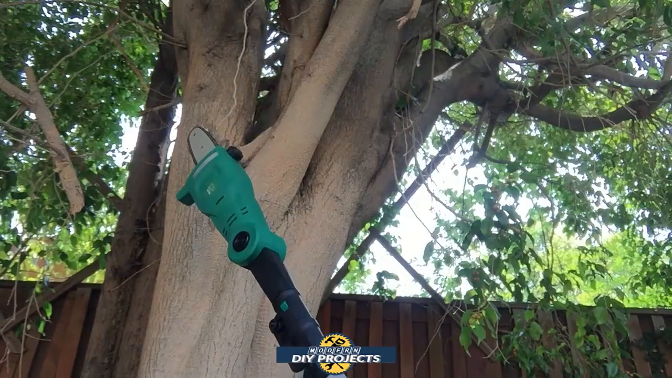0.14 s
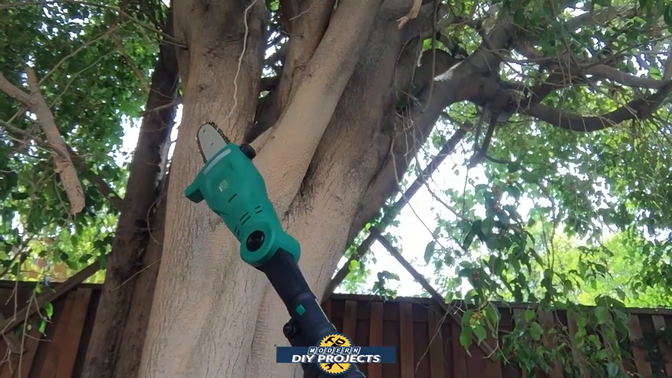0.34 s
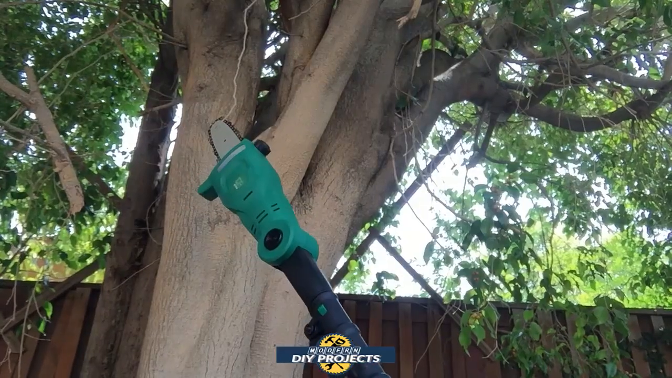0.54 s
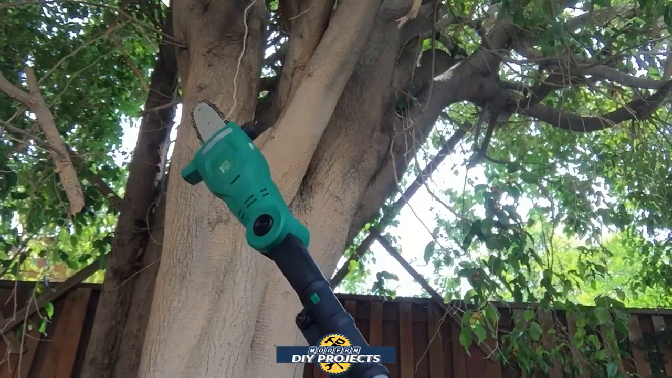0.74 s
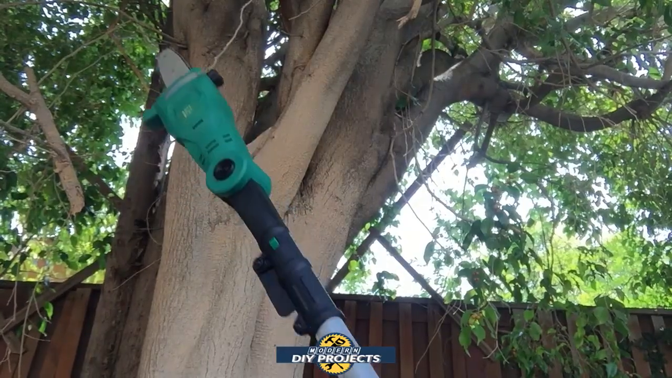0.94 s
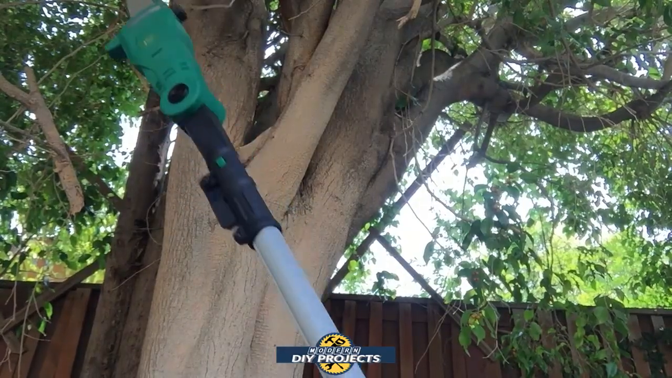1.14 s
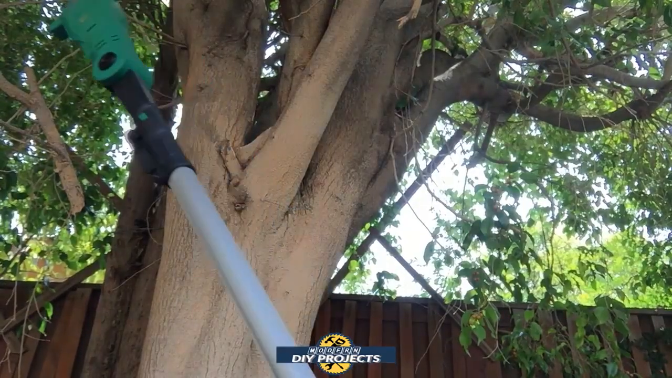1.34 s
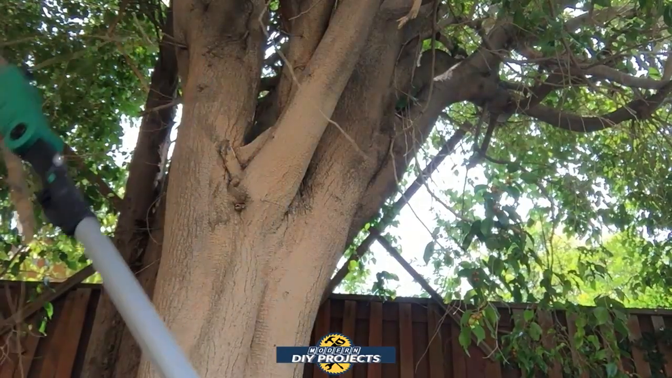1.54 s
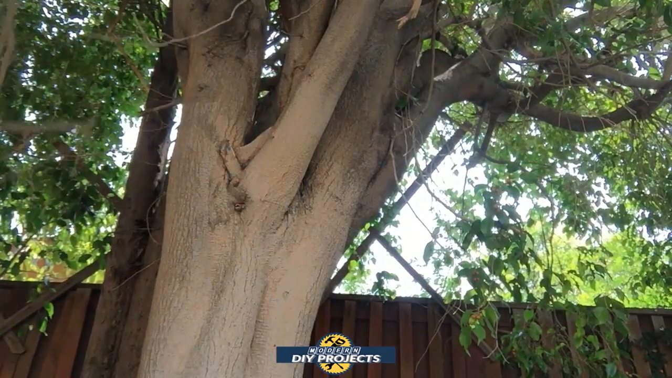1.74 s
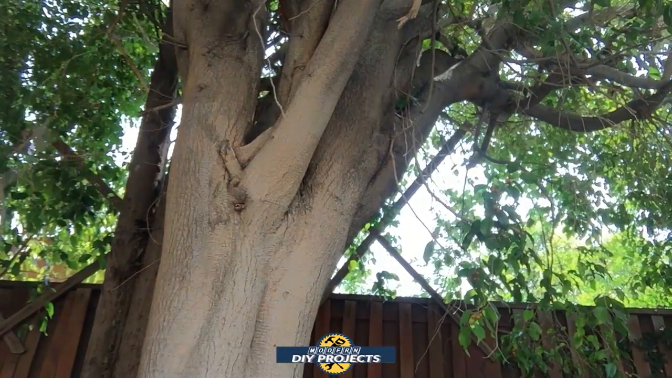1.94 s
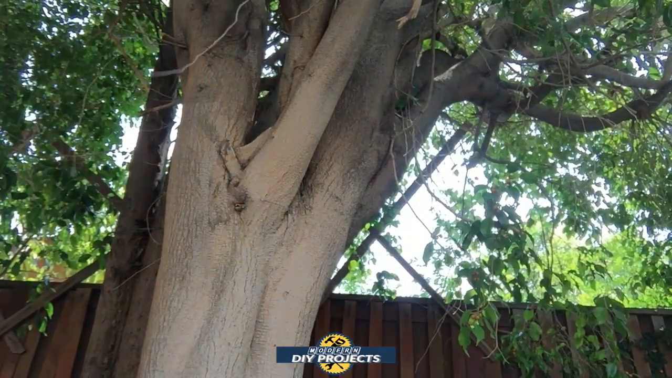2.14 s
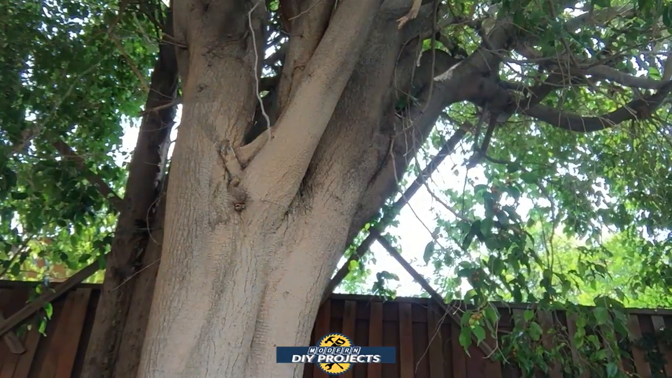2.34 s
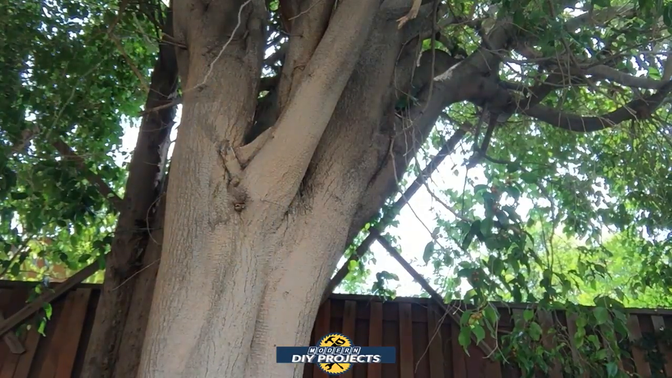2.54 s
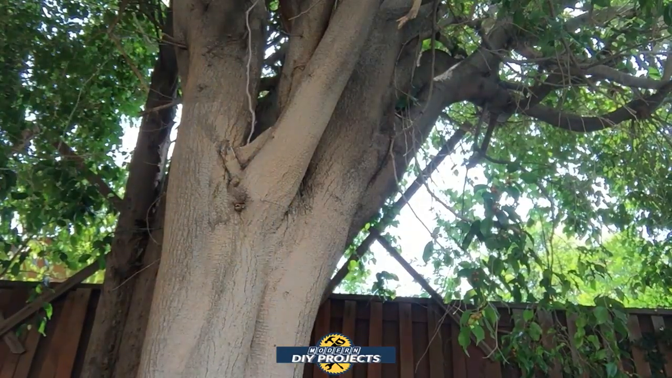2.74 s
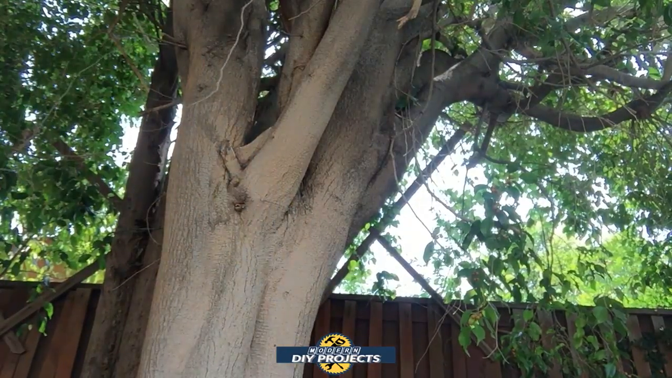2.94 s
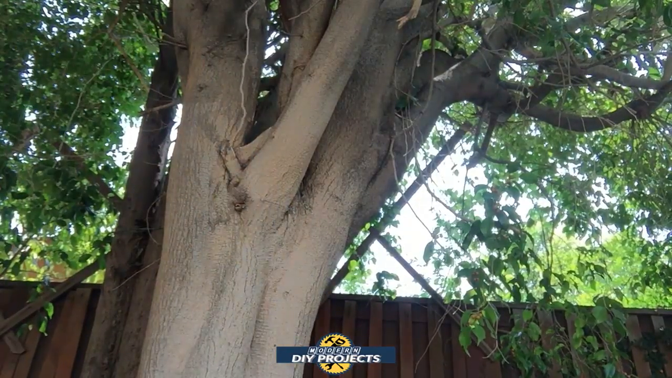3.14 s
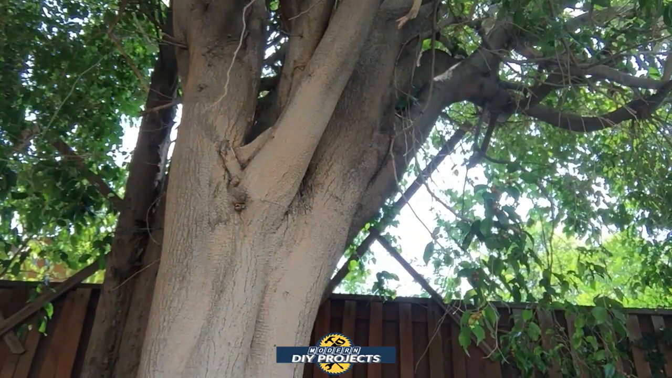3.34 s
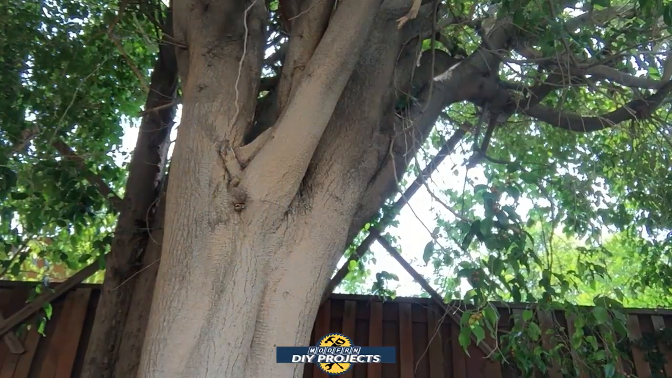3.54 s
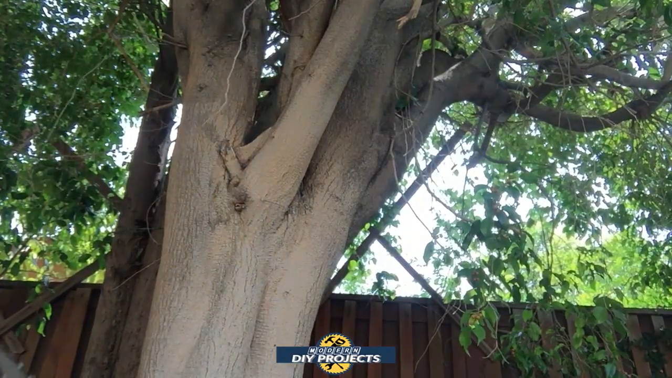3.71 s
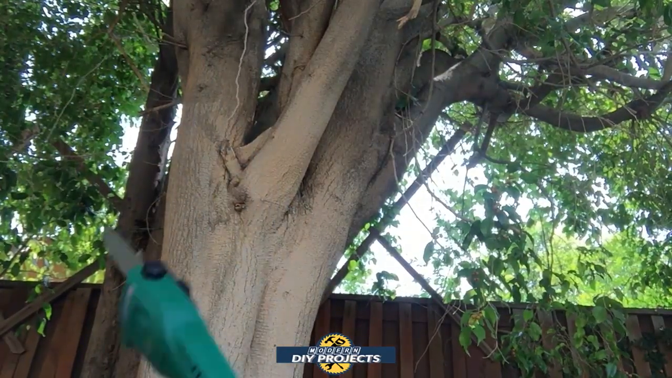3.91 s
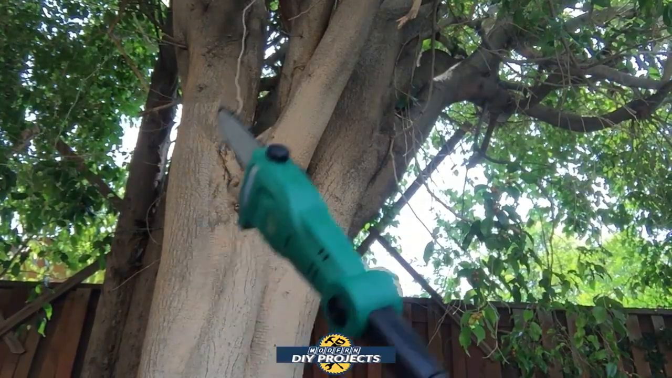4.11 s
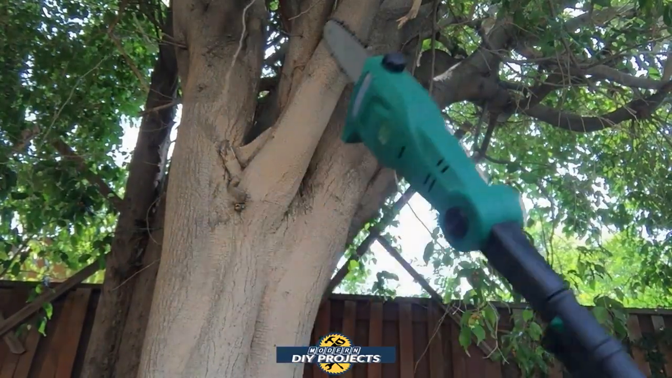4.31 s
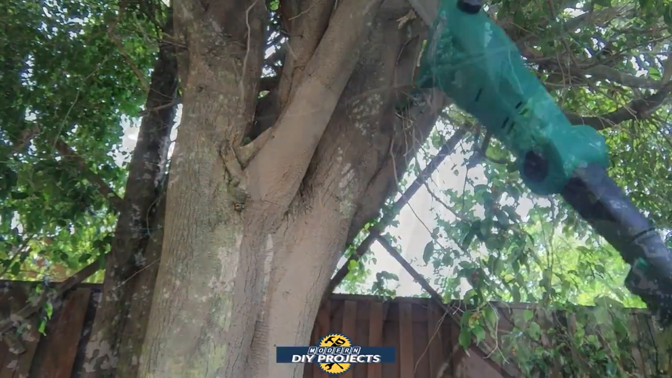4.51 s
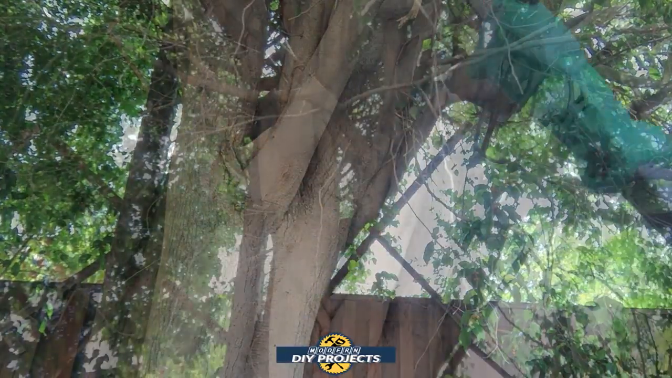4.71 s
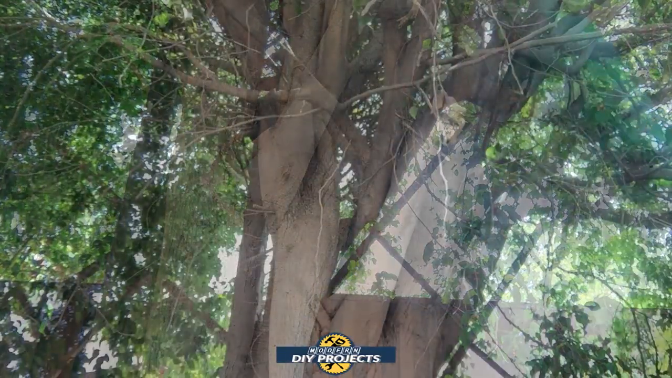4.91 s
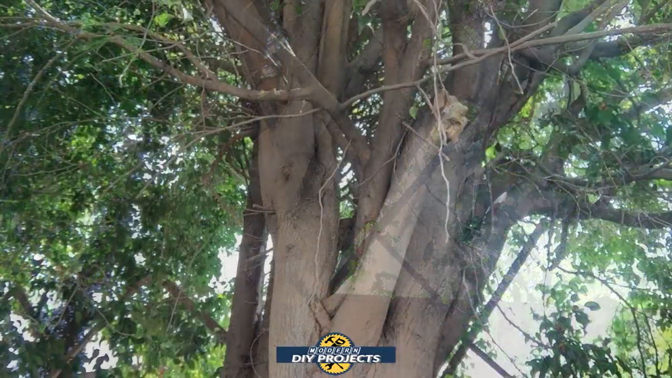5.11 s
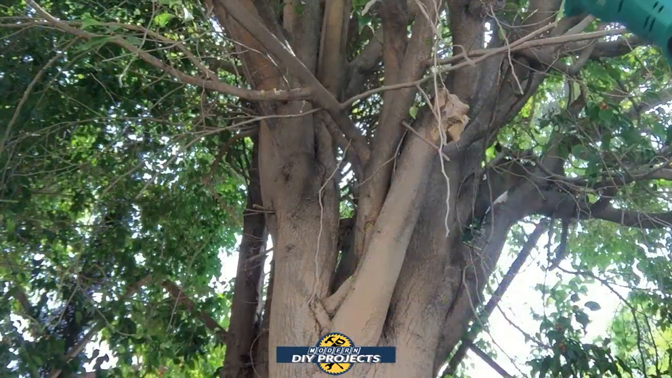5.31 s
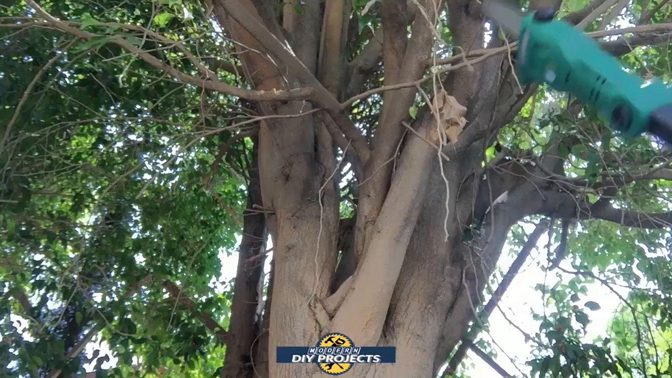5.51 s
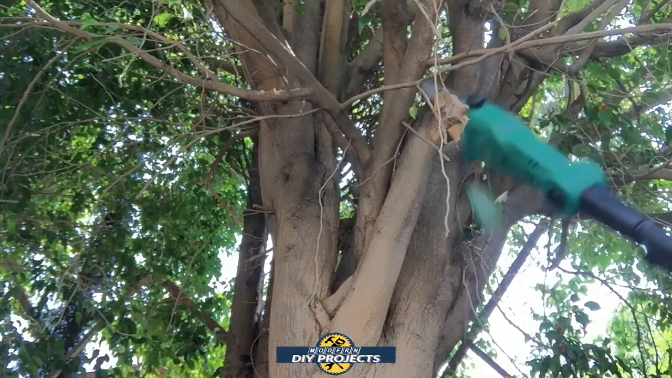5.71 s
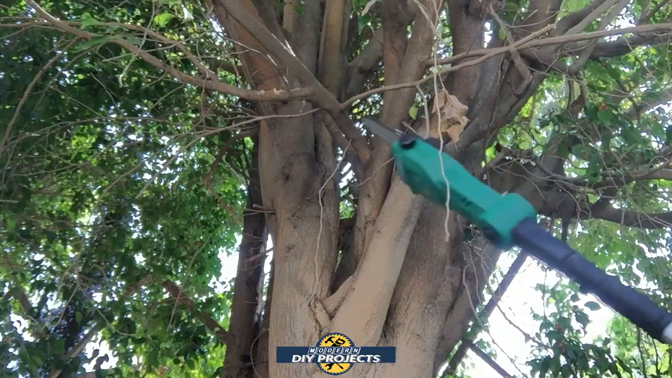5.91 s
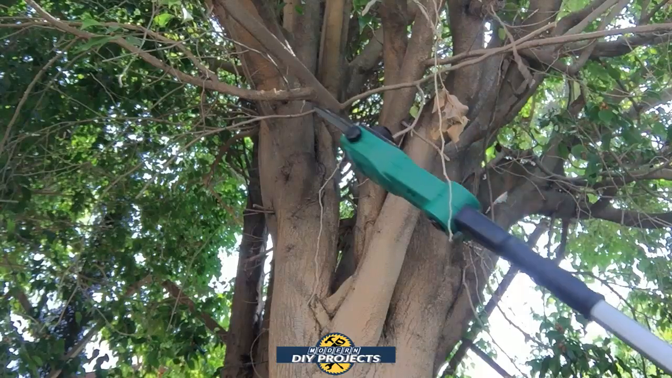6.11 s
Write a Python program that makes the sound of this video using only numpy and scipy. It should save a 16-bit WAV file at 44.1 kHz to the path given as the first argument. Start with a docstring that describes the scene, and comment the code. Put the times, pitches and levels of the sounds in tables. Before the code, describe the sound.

A cordless pole chainsaw rattles down to a stop, a cut branch knocks and rustles through leaves, then the saw spins up again, whining freely.

```python
"""Pole chainsaw and falling branch

A cordless pole chainsaw coasts to a stop in a garden tree; a cut branch knocks and rustles down through leaves.
Twigs settle, a small bird calls and a distant machine hums; then the saw spins up and runs free.
Shaft speed drives the saw: a geared-down sprocket sets the link blows, noise rings the bar, tones whine.
Branch and leaves are shaped noise bursts and ticks; the bird and the hum are wavering tones.
"""
import sys
import numpy as np
from scipy import signal
from scipy.fft import rfft, irfft, next_fast_len
from scipy.io import wavfile
from scipy.ndimage import uniform_filter1d, map_coordinates

SR = 44100
rng = np.random.default_rng(int(sys.argv[2]) if len(sys.argv) > 2 else 0)


def generate_wav(sig):
    """Save sig (samples, or channels by samples) to the path in sys.argv[1] as 16-bit PCM at SR."""
    pcm = np.round(np.clip(np.atleast_2d(sig).T, -1, 1) * 32767).astype(np.int16)
    wavfile.write(sys.argv[1], SR, pcm)


N = 276066
T = np.arange(N) / SR


def amp(db):
    """Decibels to gain."""
    return 10 ** (np.asarray(db) / 20)


def unit(x):
    """Scaled to rms 1."""
    return x / np.sqrt(np.mean(x ** 2) + 1e-20)


def along(points, hz):
    """Values of (Hz, value) points, joined by straight lines on a log frequency axis."""
    f, v = np.transpose(points)
    return np.interp(np.log(hz + 1), np.log(f + 1), v)


def over_time(points):
    """A curve through (seconds, value) points."""
    return np.interp(T, *np.transpose(points))


def ramp(start, length):
    """A straight rise from 0 to 1."""
    return np.clip((T - start) / length, 0, 1)


def swell(start, length):
    """A rounded rise and fall."""
    return np.sin(np.pi * ramp(start, length))


def wobble(rate):
    """A smooth random curve around zero, with rate knots a second."""
    knots = rng.standard_normal(int(N * rate / SR) + 4)
    fine = np.arange(8 * len(knots)) / 8
    return np.interp(T * rate, fine, map_coordinates(knots, [fine]))


def noise():
    """White noise of rms 1."""
    return rng.standard_normal(N)


def tone(hz):
    """A sine of rms 1 along a frequency curve."""
    return np.sqrt(2) * np.sin(2 * np.pi * (np.cumsum(hz) / SR + rng.random()))


def narrow(hz, width_hz):
    """A fuzzy line: narrow noise riding on a frequency curve."""
    phase = 2 * np.pi * np.cumsum(hz) / SR
    return wobble(width_hz) * np.cos(phase) + wobble(width_hz) * np.sin(phase)


def filtered(x, response):
    """x shaped by a complex response of frequency."""
    m = next_fast_len(N + SR // 2)
    return irfft(rfft(x, m) * response(np.fft.rfftfreq(m, 1 / SR)), m)[:N]


def coloured(x, points):
    """x through a causal minimum-phase filter of unit energy with the given colour."""
    size = 2048
    cepstrum = irfft(np.log(amp(along(points, np.fft.rfftfreq(size, 1 / SR)))))
    # folding the cepstrum makes the filter causal
    cepstrum[1:size // 2] *= 2
    cepstrum[size // 2 + 1:] = 0
    ring = irfft(np.exp(rfft(cepstrum)))
    return signal.fftconvolve(x, ring / np.linalg.norm(ring))[:N]


def resonances(x, modes):
    """x through parallel resonances, each a centre, a width and a level."""
    def response(f):
        return sum(amp(db) * 1j * f * w / (c * c - f * f + 1j * f * w) for c, w, db in modes)
    return filtered(x, response)


def steadied(x):
    """x with its slow level held near rms 1."""
    return x / np.sqrt(np.abs(uniform_filter1d(x ** 2, size=2200)) + 1e-6)


def decaying(x, life_s):
    """Each impulse of x becomes an exponential decay."""
    return signal.lfilter([1], [1, -np.exp(-1 / (life_s * SR))], x)


def cluster(hz, t, count=6):
    """Close modes around one pitch that beat against each other."""
    spread = 0.07  # share of the pitch
    modes = hz * (1 + spread * (np.linspace(-1, 1, count) + rng.normal(0, 0.23, count)))
    return np.sin(2 * np.pi * (modes[:, None] * t + rng.random((count, 1)))).sum(axis=0) / np.sqrt(count)


# Coast-down: first speed (turns per s), moment of rest (s), drag time (s).
COAST_HZ, STOP_S, DRAG_S = 212.9, 0.625, 2.0
# Spin-up: trigger (s), time constant (s).
TRIGGER_S, SPIN_UP_S = 4.929, 0.049
# Free speed under power. Each row: time in seconds, motor speed in turns per second.
FREE_SPEED = [(5.2, 295), (5.65, 294.5), (5.78, 291.5), (6.26, 293)]


def motor_speed():
    """Shaft turns per second: friction and drag run it down to rest, power brings it up to free speed."""
    coasting = COAST_HZ * np.expm1(np.maximum(STOP_S - T, 0) / DRAG_S) / np.expm1(STOP_S / DRAG_S)
    closing_in = 1 - np.exp(-np.maximum(T - TRIGGER_S, 0) / SPIN_UP_S)
    return coasting + over_time(FREE_SPEED) * closing_in


# Slaps of the slack chain on the bar. Each row: time in seconds, change of chain force in dB,
# pitch of the clank in Hz, clank level in dB.
SLAPS = [(.008, 2.5, 3000, -26), (.039, 0, 1262, -16.5), (.079, 2, 2700, -22), (.114, 5.5, 1210, -27),
         (.138, 3, 1020, -34), (0.153, 2.5, 3280, -20.5), (.206, 5, 2890, -26), (.261, 1.5, 820, -29),
         (.325, 7, 3600, -33), (.374, 0, 312, -39.5), (.415, 5, 457, -34), (0.479, 1, 1240, -45),
         (4.932, -11, 1000, -30), (4.936, -3, 2630, -31.5)]


def chain_slaps(driven):
    """Gain of the chain force: a coasting chain hangs slack and slaps in lumps."""
    slap_db = sum(db * np.exp(-((T - at) / 0.0036) ** 2) for at, db, _, _ in SLAPS)
    unevenness_db = 0.33 * wobble(130) + (1 - driven) * wobble(70)
    return amp(slap_db + unevenness_db - 0.99 * (0.5 - driven))


def clanks():
    """Each slap of the slack chain clanks the bar at another spot, ringing a cluster of modes."""
    t = np.arange(SR // 8) / SR
    t60_s = 0.059
    fade = amp(-60 * t / t60_s) * (1 - np.exp(-t / 0.0015))
    bar = np.zeros(N)
    for s, _, hz, db in SLAPS:
        start = round(max(s - 0.003, 0) * SR)
        bar[start:][:len(t)] += amp(db) * fade * cluster(hz, t)
    return bar


def link_blows(sprocket_hz):
    """Contact force: twelve links hit the bar per sprocket turn, over a steady sliding contact."""
    turns = np.cumsum(sprocket_hz) / SR
    links = np.flatnonzero(np.diff(np.floor(12 * turns)))
    blows = np.zeros(N)
    blows[links] = amp(3.0 * np.clip(noise()[links], -2, 2))
    return steadied(decaying(blows, life_s=0.0025) + 0.96)


# The bar swings round: from (s), taking (s). The power surge peaks this long after the trigger (s).
SWING_AT_S, SWING_S, SURGE_S = 5.15, 0.6, 0.049
# Chain noises by name. Each entry: coasting level in dB referred to full speed, power of speed,
# driven level in dB, surge while speeding up in dB, growth as the bar swings round in dB.
CHAIN = {"ring": (-32.5, 0.48, -37, 2.5, 2), "clack": (-30.5, 1.2, -37, 3.5, 0),
         "clatter": (-30, 1.02, -37.5, 7, 4.5), "hiss": (-28.5, 1.07, -33, 2, 1)}
# Swing of the loose chain against the bar. Each row: time in seconds, change of coasting level in dB.
CHAIN_SWING = [(0, -2), (.28, -0.5), (.41, 0), (.44, -4), (.48, 1), (.52, -4.5), (.565, -4.5), (.595, -18)]


def chain_gain(name, pace):
    """A chain noise grows with speed, surges as the motor takes up slack, shifts as the bar swings round."""
    coast_db, power, driven_db, surge_db, swing_db = CHAIN[name]
    age = np.maximum(T - TRIGGER_S, 0) / SURGE_S
    loose_db = coast_db + over_time(CHAIN_SWING)
    powered_db = driven_db + surge_db * age * np.exp(1 - age) + swing_db * ramp(SWING_AT_S, SWING_S)
    return amp(np.where(T < TRIGGER_S, loose_db, powered_db)) * pace ** power


# Steel bar and housing modes. Each row: centre in Hz, width in Hz, relative level in dB.
BAR = [(930, 150, -1.5), (1167, 230, 4), (1271, 46, -1), (1477, 44, -20)]


def bar_ringing(force, pace):
    """Link noise rings the steel bar, trimmed of lows and highs and held to an even level."""
    bar = resonances(force * noise(), BAR)
    bar = filtered(bar, lambda f: f ** 2 / (f ** 2 + 450 ** 2) / (1 + (f / 2200) ** 4))
    return chain_gain("ring", pace) * steadied(bar)


# Colour of links dropping onto the sprocket. Each row: frequency in Hz, relative level in dB per Hz.
CLACK = [(200, -65.5), (600, -19), (1500, -19), (1950, -13.5), (2350, -3.5), (2680, 1), (2950, -5.5),
         (3400, -9), (6000, -18.5), (16000, -43.5)]
# Colour of links clattering. Each row: frequency in Hz, relative level in dB per Hz.
CLATTER = [(600, -48.5), (2300, -22.5), (2850, -3.5), (3200, 1.5), (3700, 1), (4100, -3), (4500, -3),
           (4950, -6.5), (6500, -24), (16000, -65.5)]


def link_rattle(force, pace):
    """Links drop onto the sprocket and clatter: two colours of noise under the same contact force."""
    clack = chain_gain("clack", pace) * coloured(force * noise(), CLACK)
    clatter = chain_gain("clatter", pace) * coloured(force * noise(), CLATTER)
    return clack + clatter


def chain_rub(slap, shaft_hz, sprocket_hz):
    """Rubbing force: it pulses once and twice per turn of motor and sprocket."""
    motor_pulse = 1 + 0.14 * tone(shaft_hz) + 0.065 * tone(2 * shaft_hz)
    sprocket_pulse = 1 + 0.074 * tone(sprocket_hz) + 0.1046 * tone(2 * sprocket_hz)
    return slap * motor_pulse * sprocket_pulse


# Slow links strike softly: hiss above this pitch (Hz) fades with speed, by this power.
SOFT_HZ, SOFT_POWER = 7650, 0.69
# Colour of the chain hiss. Each row: frequency in Hz, relative level in dB per Hz.
HISS = [(1500, -42), (4000, -10.5), (5000, -5.5), (5600, 0), (6700, -1), (7900, -4.5), (9000, -6.5),
        (9800, -6), (10400, -11.5), (11200, -6), (13500, -8.5), (16000, -13)]


def chain_hiss(rub, pace):
    """Rubbing links hiss, losing their top end as they slow."""
    hiss = coloured(rub * noise(), HISS)
    dull = filtered(hiss, lambda f: 1 / (1 + (f / SOFT_HZ) ** 6))
    return chain_gain("hiss", pace) * (dull + pace ** SOFT_POWER * (hiss - dull))


# Base level under power (dB), extra for loose coasting gears (dB).
GEAR_DB, GEAR_SLACK_DB = -38.25, 4.5
# Critical speed (turns per s), half width of its zone (turns per s), rise there (dB), extra under power (dB).
CRITICAL_HZ, CRITICAL_WIDTH_HZ, CRITICAL_DB, GEAR_POWER_DB = 220, 44, 7.5, 10


def gear_rattle(shaft_hz, pace, driven, slap):
    """Seven pinion teeth rattle in their play and shake the bar, most of all near a critical speed."""
    # the pinion runs slightly off centre: a sideband one shaft order lower
    off_centre = 0.68 * narrow(6 * shaft_hz, width_hz=170)
    teeth = (0.95 - 0.35 * driven) * narrow(7 * shaft_hz, width_hz=190) + off_centre
    mesh = amp(-4.0) * teeth * (1 - 0.5 * driven) + amp(-11.0) * resonances(teeth, BAR)
    # second harmonic of the tooth rate
    mesh += amp(7.5 - 12.4 * driven) * pace ** 2 * narrow(14 * shaft_hz, width_hz=400)
    critical = np.exp(-((shaft_hz - CRITICAL_HZ) / CRITICAL_WIDTH_HZ) ** 2)
    critical_db = (CRITICAL_DB + GEAR_POWER_DB * driven) * critical
    gear = amp(GEAR_DB + critical_db + GEAR_SLACK_DB * (1 - driven)) * pace ** 1.3 * slap * mesh
    return filtered(gear, lambda f: f ** 4 / (f ** 4 + 400 ** 4))


# Colour of the housing. Each row: frequency in Hz, relative level in dB per Hz.
HOUSING = [(100, -51), (190, -27), (260, -9), (450, -5), (650, -2.5), (900, 0), (1300, -5.5), (1750, -3.5),
           (2200, 0), (3200, -19), (9000, -41.5)]


def housing_roar(force, pace, driven):
    """Chain force shakes the housing into a broad roar that grows with speed."""
    # coasting and driven levels, before the speed factor
    level = amp(-38) * (1 - driven) + amp(-36.5) * driven
    return level * pace ** 1.1 * coloured(force * noise(), HOUSING)


# Colour of the garden air. Each row: frequency in Hz, relative level in dB per Hz.
GARDEN = [(20, -34), (40, -14.5), (62, -3), (100, -3), (160, -8), (250, -5.5), (380, -12), (600, -20),
          (900, -20), (2500, -23.5), (3600, -28), (7000, -34.5), (11000, -45), (16000, -61.5)]
# Colour of the low rumble. Each row: frequency in Hz, relative level in dB per Hz.
RUMBLE = [(25, -30.5), (60, 0), (110, -3.5), (160, -1), (210, -18), (500, -47.5)]
# Course of the low rumble. Each row: time in seconds, mean level in dB.
RUMBLE_LEVEL = [(0, -66), (0.6, -64.5), (0.8, -59.5), (1.1, -64), (1.3, -62.5), (1.7, -63), (2.35, -59.5),
                (2.7, -65.5), (3.6, -66), (3.88, -57.5), (4.05, -59.5), (5.0, -68.5)]


def town_rumble():
    """Far town rumble: two unsteady beds of coloured noise."""
    air = amp(-61.5 + 2.2 * wobble(8.7)) * coloured(noise(), GARDEN)
    rumble = amp(over_time(RUMBLE_LEVEL) + 2.3 * wobble(15)) * coloured(noise(), RUMBLE)
    return air + rumble


# Distant machine. Each row: mean pitch in Hz, mean level of the tone in dB rms.
HUM = [(59, -71), (159, -68), (291, -64.5), (350, -77), (582, -79), (640, -82)]


def machine_hum():
    """A distant machine: tones waver in pitch and level, each with a fuzzy band around it."""
    hum = np.zeros(N)
    for hz, db in HUM:
        line = tone(hz + 1.23 * wobble(12)) + 0.34 * narrow(np.full(N, hz), 21.86)
        hum += amp(db + 2.1 * wobble(9)) * line
    return hum


def chain_squeal():
    """Just before the chain rests it squeals: a shaky tone that slides up."""
    start_s, length_s = 0.525, 0.08
    hz = 1000 + (1350 - 1000) * ramp(start_s, length_s)
    level = amp(-53 + 2.2 * wobble(89)) * swell(start_s, length_s)
    return level * tone(hz * (1 + 0.025 * wobble(220)))


# Short faint squeaks. Each row: start in seconds, pitch in Hz, level in dB, length in seconds,
# level of the octave above in dB relative to the main pitch.
SQUEAKS = [(1.124, 3310, -64.5, 0.033, -18), (2.851, 2010, -54, 0.012, -13), (2.974, 1250, -63, 0.075, -22),
           (3.938, 3040, -55, 0.021, -4), (3.985, 3350, -69, .03, -2), (4.165, 3900, -66, 0.041, -15),
           (4.205, 2200, -62, 0.038, -5), (4.439, 1894, -54.5, .014, -19), (4.524, 2410, -61, 0.056, -19),
           (4.715, 2330, -56.5, 0.026, -17)]


def squeak(s, hz, db, length, octave_db):
    """A short rasp that slides upward, with its octave."""
    pitch = hz * (1 + 0.06 * (ramp(s, length) - 0.5))
    width_hz = 0.16 * hz ** 2 / 1000
    rasp = narrow(pitch, width_hz) + amp(octave_db) * narrow(2 * pitch, 0.35 * hz)
    return amp(db) * swell(s, length) * rasp


def squeaks():
    """All the raspy little squeaks."""
    return sum(squeak(*row) for row in SQUEAKS)


# A 1 kHz stick rings this long (s); higher ones die sooner, by this power of pitch.
STICK_T60_S, STICK_DAMPING = 0.042, 0.1
# Colour of thick wood. Each row: frequency in Hz, relative level in dB per Hz.
THUD = [(100, -29), (300, -6.5), (600, -4), (1100, 2), (1500, 1.5), (2500, -11), (8000, -92)]
# Modes of a knocked branch. Each row: centre in Hz, width in Hz, relative level in dB.
WOOD = [(1160, 66, -6), (1310, 90, -8), (2180, 120, -3), (2500, 250, 0), (2970, 590, 2.5),
        (3640, 400, -5.5)]
# Colour of snapping twigs. Each row: frequency in Hz, relative level in dB per Hz.
SNAP = [(1500, -6.5), (3800, -4.5), (5500, -2), (7000, 1.5), (8200, 0.5), (9200, -0.5), (10400, -5),
        (11600, -2), (16000, -5.5)]
# Wood striking wood and twigs breaking. Each row: start in seconds, then relative levels in dB
# of crack, thud and snap, then the stick's own pitch in Hz.
KNOCKS = [(1.482, -62, -50, -76, 1310), (1.562, -57, -50, -57, 1310), (1.6, -36, -26, -44, 960),
          (1.627, -35, -50, -19, 1880), (1.7168, -32, -27.5, -31.5, 560), (1.734, -47, -49, -35, 1510),
          (1.77, -36, -45, -54, 2240), (1.78, -29, -40, -44, 2020), (1.826, -49, -55, -35.5, 3930),
          (1.862, -45, -41, -47, 1720), (1.892, -34.5, -35, -54, 2260), (1.921, -39.5, -44, -59, 1450),
          (1.969, -49, -55, -48.5, 2100), (2.035, -45, -40, -60, 2130), (2.058, -41, -42, -41.5, 3120),
          (2.089, -48.5, -39.5, -36, 5330), (2.141, -51, -45, -60, 915), (2.161, -48, -43, -60, 2220),
          (2.425, -53.5, -51, -70, 1920), (2.502, -37.5, -72, -39, 6710), (2.556, -47, -65, -47.5, 4540),
          (2.655, -53, -47, -70, 2300), (2.685, -47.5, -55, -61, 2210), (2.7832, -31, -38, -19, 2740),
          (3.121, -47, -72, -41.5, 5830), (3.172, -68, -73, -47, 6060), (3.237, -56, -64, -47, 5430),
          (3.255, -57, -70, -58, 4100), (3.344, -59, -72, -66, 3440), (3.384, -54, -70, -58, 5800),
          (3.417, -49.5, -54, -47, 4350), (3.442, -56, -54, -58, 2446), (3.472, -55, -66, -68, 2900),
          (3.668, -61, -75, -55, 5240), (3.94, -52, -70.5, -72, 2200), (4.143, -65, -75, -49.5, 6540)]


def knocks():
    """Each contact is a sharp blow and a gritty crunch: dull from thick wood, bright from thin twigs."""
    t = np.arange(SR // 8) / SR
    bursts = np.zeros((4, N))
    for s, crack_db, thud_db, snap_db, hz in KNOCKS:
        khz = hz / 1000
        decay = amp(-60 * t / (STICK_T60_S / khz ** STICK_DAMPING))
        fade = (0.63 * decay + 0.72 * amp(-60 * t / 0.006)) * (1 - np.exp(-t / 0.00055))
        # a crunch is a run of tiny fractures
        fractures = np.clip(unit(uniform_filter1d(rng.standard_normal(len(t)), size=24)), -2, 2)
        grit = amp(5 * fractures * (0.5 - np.exp(-t / 0.0066)))
        levels = amp([[thud_db], [crack_db], [snap_db]])
        crunch = levels * fade * unit(grit) * rng.standard_normal((3, len(t)))
        # the bright snap is over sooner than the rest
        crunch[2] *= np.exp(-t / 0.0045)
        # every stick also clacks around its own pitch
        clack = amp(crack_db + 1.0) * decay * cluster(hz, t)
        bursts[:, round(s * SR):][:, :len(t)] += np.vstack([crunch, clack])
    thud, crack, snap, sticks = bursts
    branch = amp(10.5) * resonances(crack, WOOD)
    return coloured(thud, THUD) + branch + coloured(snap, SNAP) + sticks


# Rise time of a sweep, also its closing fade (s); time from full level to that closing fade (s).
RUSTLE_ATTACK_S, RUSTLE_LIFE_S = 0.027, 0.54
# Settling foliage: from (s), until (s), first mean level (dB), fade (dB per s), unevenness (dB).
SETTLE_FROM_S, SETTLE_TO_S, SETTLE_DB, SETTLE_DB_PER_S, SETTLE_SWING_DB = 2.313, 4.63, -65, 5, 6.5
# Sweeps of the branch through leaves. Each row: time of full level in seconds, relative level in dB,
# hold in seconds, fade in dB per second.
RUSTLES = [(1.6, -50, 0.041, 101), (1.757, -45.5, 0.15, 30), (2.51, -55, 0.024, 124),
           (2.78, -65, 0.011, 156), (2.26, -65, 0.033, 300), (2.97, -70, 0.026, 120),
           (3.355, -68.5, 0.045, 120), (4.161, -60.5, 0.037, 246)]


def leaf_motion():
    """Each sweep rises, holds and fades; afterwards the foliage settles unevenly."""
    sweeps = np.zeros(N)
    for s, db, hold, fade_db in RUSTLES:
        level = amp(db - fade_db * np.maximum(T - s - hold, 0))
        rise = ramp(s - RUSTLE_ATTACK_S, RUSTLE_ATTACK_S)
        sweeps += level * rise * (1 - ramp(s + RUSTLE_LIFE_S, RUSTLE_ATTACK_S))
    settling_db = SETTLE_DB - SETTLE_DB_PER_S * (T - SETTLE_FROM_S) + SETTLE_SWING_DB * wobble(15)
    settling = amp(settling_db) * (ramp(SETTLE_FROM_S, 0.076) - ramp(SETTLE_TO_S, 0.1))
    return sweeps + settling


def twigs(count, pitch_hz, cycles):
    """Scattered thin sticks tap each other, each at its own pitch."""
    t = np.arange(SR // 50) / SR
    start, size = rng.random(count)[:, None], rng.random((count, 1))
    hz = np.minimum(pitch_hz * np.exp(0.368 * rng.standard_normal((count, 1))), SR / 4)
    taps = amp(-16 * size) * np.exp(-t * hz / cycles) * np.sin(2 * np.pi * hz * t)
    at = (start * N).astype(int) + np.arange(len(t))
    return unit(np.bincount(at.ravel(), taps.ravel(), N)[:N])


# Colour of the leaves. Each row: frequency in Hz, relative level in dB per Hz.
LEAVES = [(150, -21), (400, -7), (1400, -7.5), (2400, -4), (3500, -5), (5000, -5.5), (6500, -5),
          (8500, -11.5), (13800, -15.5), (16000, -18)]


def leaves():
    """Clumps of tiny leaf contacts and twig taps over a soft brushing."""
    # 520 contacts a second on average
    ticks = (rng.random(N) < 520 / SR) * amp(4.7 * np.minimum(rng.exponential(size=N), 2.5))
    crinkle = decaying(ticks, life_s=0.001) * noise()
    brushing = unit(unit(crinkle) + 0.99 * noise()) * amp(2.9 * wobble(70))
    taps = twigs(count=1000, pitch_hz=2230, cycles=3.2)
    return leaf_motion() * (amp(-2.5) * coloured(brushing, LEAVES) + amp(-10) * taps)


def debris():
    """Bits of bark and twig patter down: random sharp ticks that follow the stirring of the leaves."""
    per_s, smallest_db, spread_db = 77, -3, 4.5
    ticks = (rng.random(N) < per_s / SR) * amp(smallest_db + spread_db * rng.random(N))
    crackle = decaying(ticks, life_s=0.0014) * noise()
    return leaf_motion() * coloured(crackle, LEAVES)


# Thin bird notes. Each row: start in seconds, length in seconds, settled pitch in Hz, level in dB.
BIRD = [(2.048, 0.087, 5430, -55), (4.256, 0.057, 5300, -61), (4.302, 0.076, 5350, -67)]


def bird():
    """Thin quavering notes that start sharp and drop towards their pitch."""
    quaver = 0.009 * wobble(200)
    notes = np.zeros(N)
    for s, length, hz, db in BIRD:
        drop = 0.044 * np.exp(-np.abs(T - s) / 0.0207)
        notes += amp(db) * swell(s, length) * tone(hz * (1 + quaver + drop))
    return notes


def low_drone():
    """A low drone comes and goes, unsteady in pitch and level."""
    start_s, length_s, edge_s = 4.405, 0.466, 0.028
    held = ramp(start_s, edge_s) - ramp(start_s + length_s - edge_s, edge_s)
    return amp(-55 + 3.4 * wobble(16)) * held * tone(146.5 + 2.04 * wobble(16))


# Motor whine. Each row: multiple of the shaft rate, level in dB rms before the speed factor,
# change as the bar swings round in dB.
WHINE = [(1, -53, 2), (2, -42.5, 0.5), (4, -49.5, 2), (6, -53.5, 5.5), (7, -57.5, 11), (8, -44.5, -2),
         (9.08, -41, -5), (14.04, -63, 8), (15, -46, 3.5), (19.18, -52, -2)]


def motor_whine(shaft_hz, sprocket_hz, pace, driven):
    """Shaft orders and the link rate sing out under power, most of all near full speed."""
    swing = ramp(SWING_AT_S, SWING_S)
    whine = amp(-49.5 + 2.6 * wobble(25)) * tone(12 * sprocket_hz * (1 + 0.0098 * wobble(30)))
    for order, db, swing_db in WHINE:
        hz = order * shaft_hz * (1 + 0.0014 * np.sqrt(order) * wobble(60))
        whine += amp(db + swing_db * swing + 0.56 * wobble(14)) * tone(hz)
    return whine * pace ** 3 * driven


# Moving ring of the bar. Each row: time in seconds, pitch in Hz, level in dB before the chain slaps.
BAR_RING = [(4.95, 2800, -43), (5.0, 3200, -33), (5.07, 3700, -51), (5.55, 3400, -49), (5.69, 3200, -34),
            (5.77, 3550, -51), (5.95, 3650, -35.5), (6.08, 3950, -45), (6.2, 4130, -33), (6.26, 4150, -34)]


def lifted_bar_ring(slap, driven):
    """As the saw is lifted a ring of the bar swells and ebbs, its pitch moving upward overall."""
    when, hz, db = np.transpose(BAR_RING)
    ring = narrow(np.interp(T, when, hz), width_hz=420)
    return driven * slap * amp(np.interp(T, when, db)) * ring


# Whirr following the angle of the bar. Each row: time in seconds, pitch in Hz.
WHIRR_PITCH = [(4.95, 5110), (5.08, 5793), (5.33, 5740), (5.62, 6153), (5.95, 6500), (6.26, 6530)]
# Bands of the whirr. Each row: share of that pitch, width in Hz, level in dB before speed and rub,
# change as the bar swings round in dB.
WHIRR = [(0.485, 518, -44, 4.5), (1, 954, -40, 2.5)]


def chain_whirr(rub, pace, driven):
    """Two bands of whirr climb as the bar swings round."""
    swing, hz = ramp(SWING_AT_S, SWING_S), over_time(WHIRR_PITCH)
    bands = sum(amp(db + swing_db * swing) * narrow(share * hz, width)
                for share, width, db, swing_db in WHIRR)
    return driven * pace * rub * bands


def saw():
    """Motor speed drives every part: links, bar, gear, housing and whine."""
    shaft_hz = motor_speed()
    sprocket_hz = shaft_hz / 6.86  # reduction gear
    pace = shaft_hz / np.max(shaft_hz)
    driven = ramp(TRIGGER_S, 0.05)
    slap = chain_slaps(driven)
    force = slap * link_blows(sprocket_hz)
    rub = chain_rub(slap, shaft_hz, sprocket_hz)
    chain = bar_ringing(force, pace) + link_rattle(force, pace) + chain_hiss(rub, pace)
    chain += lifted_bar_ring(slap, driven) + chain_whirr(rub, pace, driven)
    chain += clanks() + chain_squeal()
    drive = gear_rattle(shaft_hz, pace, driven, slap) + housing_roar(force, pace, driven)
    return chain + drive + motor_whine(shaft_hz, sprocket_hz, pace, driven)


# Decay of the yard. Each row: frequency in Hz, time to fall 60 dB in seconds.
YARD = [(200, 0.3), (2000, 0.15), (6000, 0.24), (14000, 0.29)]


def yard(x):
    """Fence, trunk and foliage scatter a short tail: decaying noise, 200 samples late."""
    hz, t, z = signal.stft(rng.standard_normal(SR // 2), SR, nperseg=256)
    tail = signal.istft(z * amp(-60 * t / along(YARD, hz)[:, None]), SR, nperseg=256)[1]
    return signal.fftconvolve(np.pad(x, (200, 0)), tail / np.linalg.norm(tail))[:N]


def wandering(x, rate):
    """x with its phase wandering at random, by 1.32 radians times the wobble."""
    analytic = signal.hilbert(x, next_fast_len(N))[:N]
    return np.real(analytic * np.exp(1j * 1.32 * wobble(rate)))


def scattered(x):
    """Swaying foliage smears the pitch of an echo; small leaves smear the treble faster."""
    split_hz = 2220
    low = filtered(x, lambda f: 1 / np.sqrt(1 + (f / split_hz) ** 8))
    high = filtered(x, lambda f: (f / split_hz) ** 4 / np.sqrt(1 + (f / split_hz) ** 8))
    return wandering(low, rate=150) + wandering(high, rate=800)


def scene():
    """The saw, the falling branch and the garden, heard from one spot."""
    tool = saw()
    branch = knocks() + leaves() + debris()
    calls = squeaks() + bird()
    garden = town_rumble() + machine_hum() + low_drone()
    echoes = yard(amp(-13.5) * tool + amp(-4.5) * calls) + amp(-5.5) * scattered(yard(branch))
    return (tool + branch + calls + echoes + garden)[None]


def record(dry):
    """Nothing above the 15.9 kHz band limit is kept."""
    return filtered(dry[0], lambda hz: hz < 15900)[None]


dry = scene()
out = record(dry)
generate_wav(out)
```